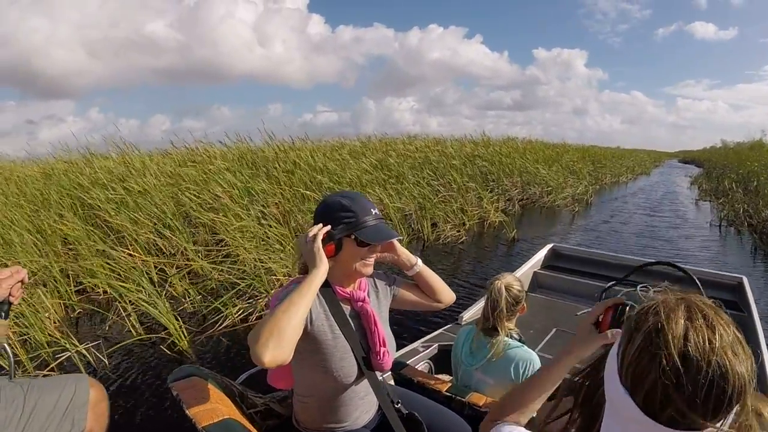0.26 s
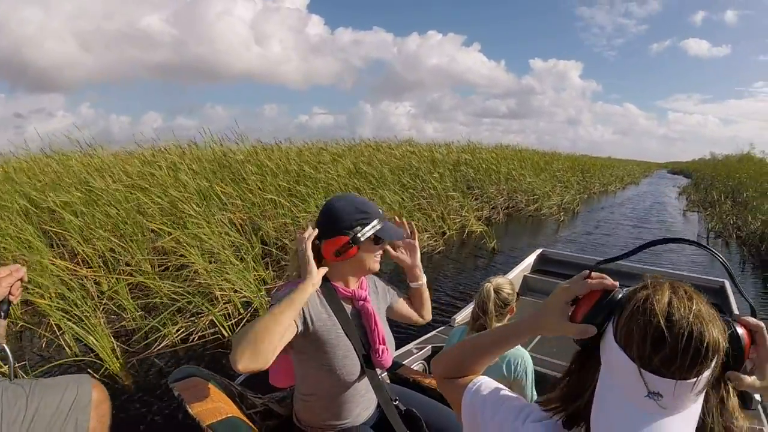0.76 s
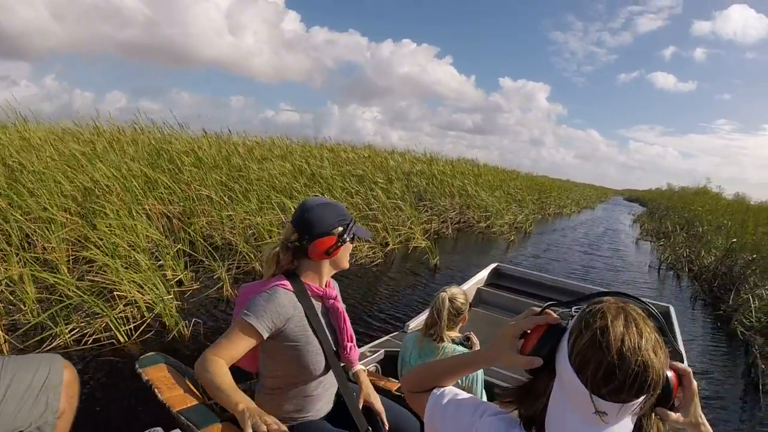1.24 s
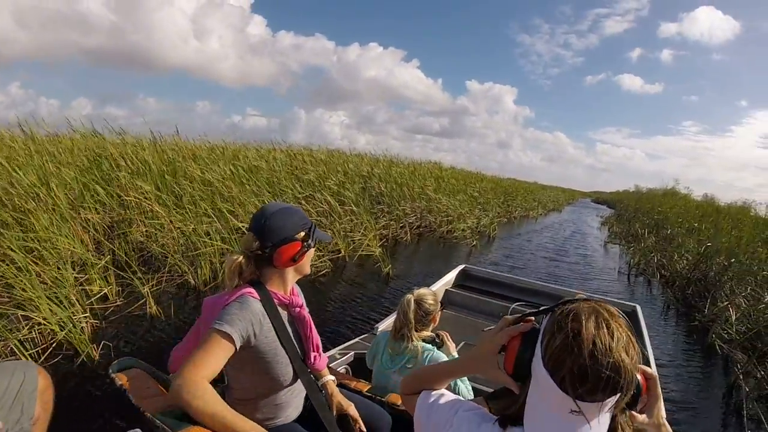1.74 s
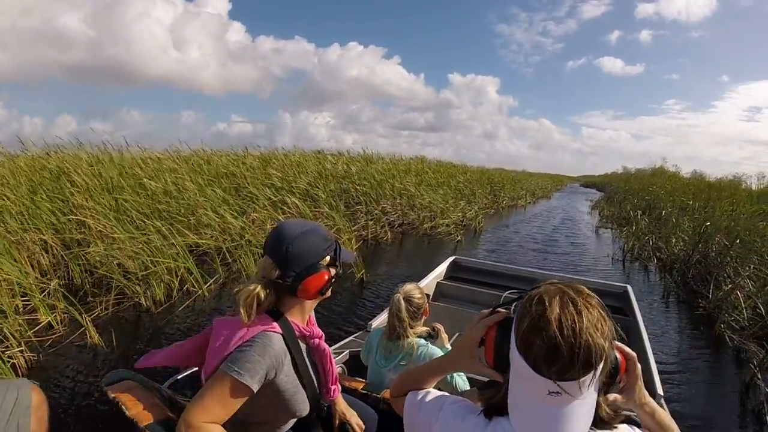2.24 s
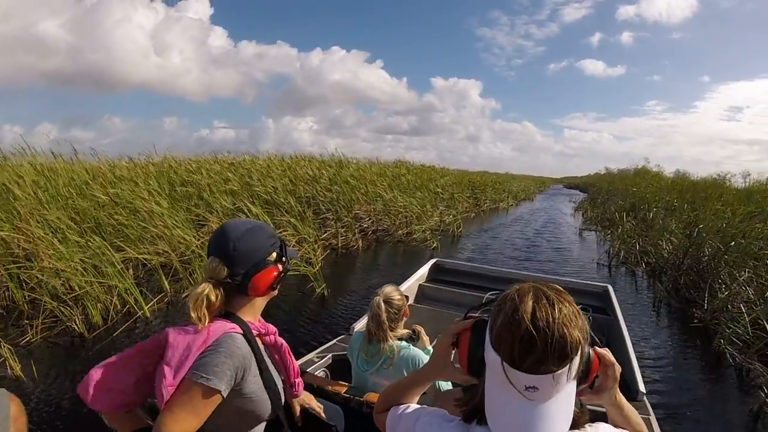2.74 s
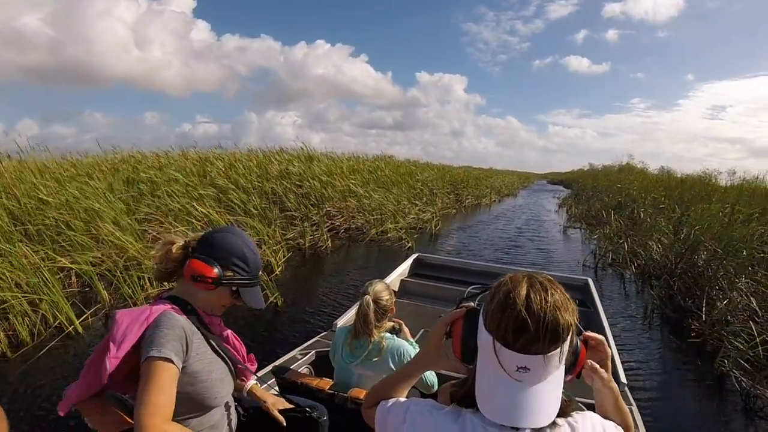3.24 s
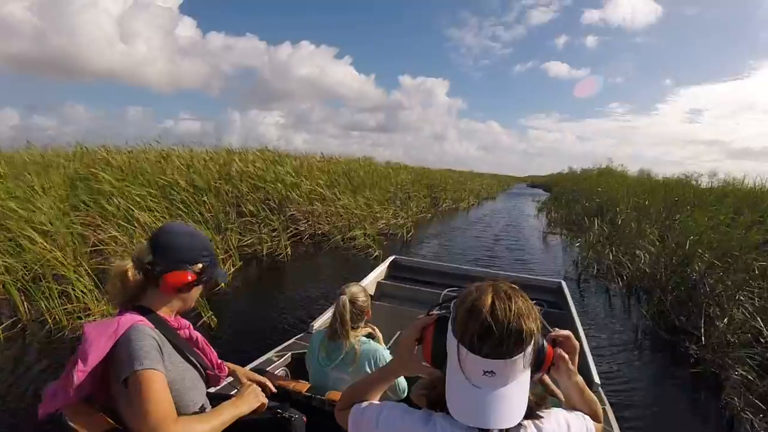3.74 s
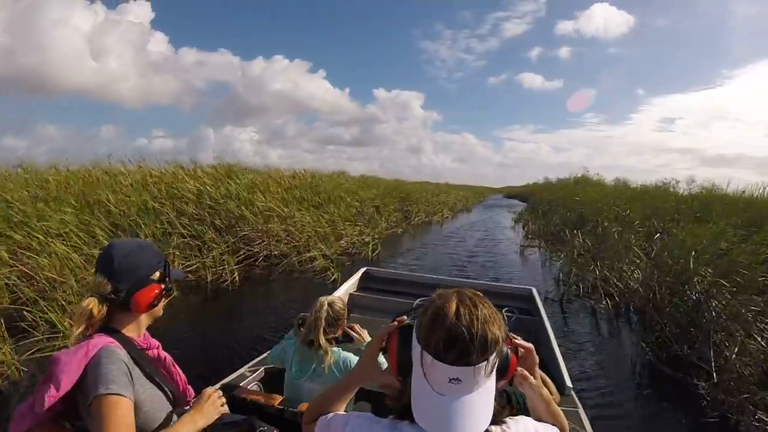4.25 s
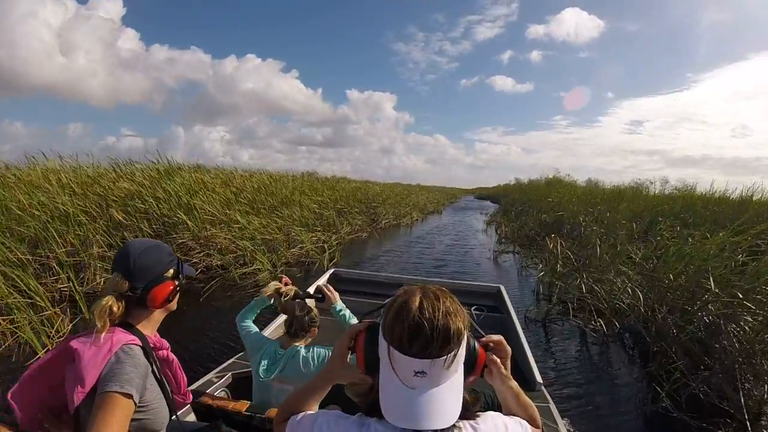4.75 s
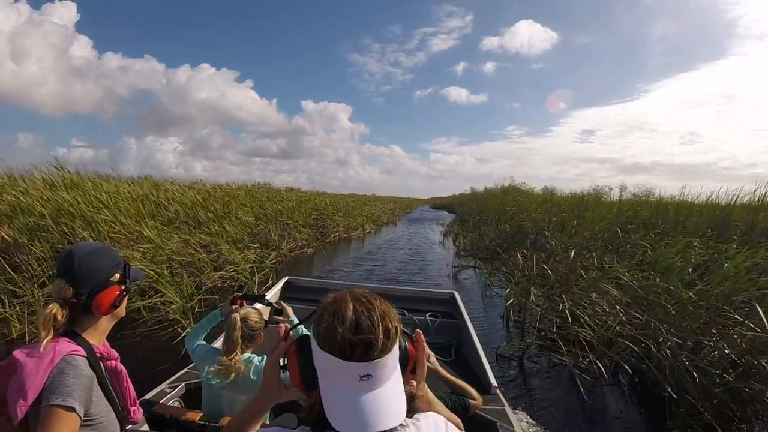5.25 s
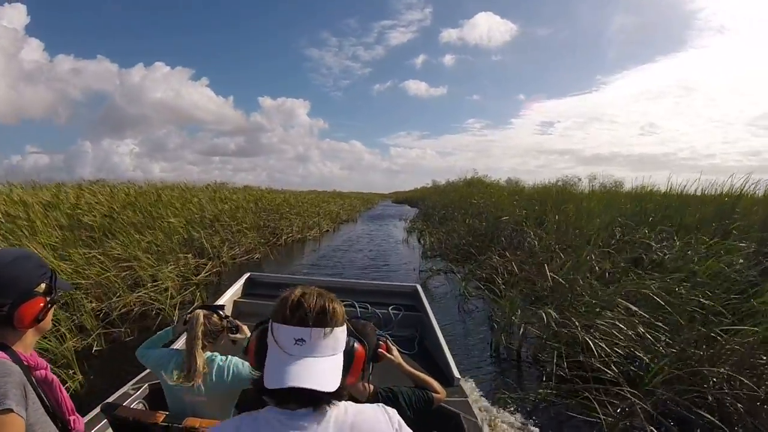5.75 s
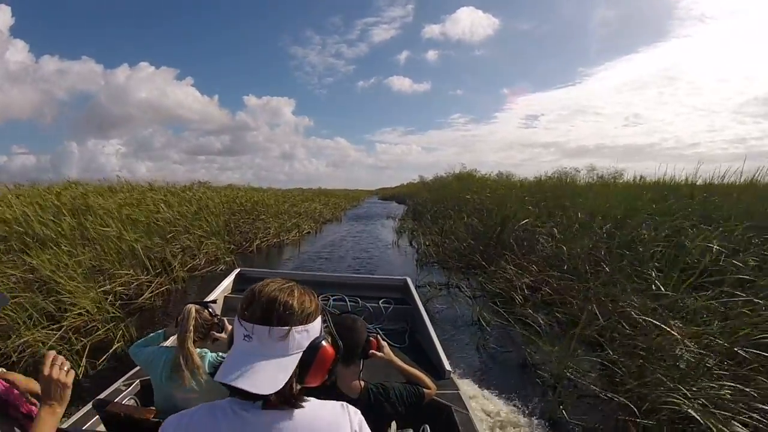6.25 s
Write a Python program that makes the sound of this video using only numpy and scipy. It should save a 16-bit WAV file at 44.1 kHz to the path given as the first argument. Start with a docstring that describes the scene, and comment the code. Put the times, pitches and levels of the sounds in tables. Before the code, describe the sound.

Close engine drone from an airboat: steady lumpy idle, then stepped surges rising in pitch and loudness into full roar, blade buzz and wind-like wash.

```python
"""The V8 exhaust of an airboat, heard from the passenger seats: it idles, then the throttle opens in steps.
The exhaust drones on multiples of the engine's two-turn firing cycle. The geared-down propeller adds
blade tones and a rush of air that grow with speed. Valve gear and intake air hiss, and the toothed
drive belt whines. An echo off the water weakens one band of the sound."""
import sys
import numpy as np
from scipy import signal
from scipy.fft import rfft, irfft, next_fast_len
from scipy.io import wavfile
from scipy.ndimage import uniform_filter1d, minimum_filter1d, map_coordinates

SR = 44100
rng = np.random.default_rng(int(sys.argv[2]) if len(sys.argv) > 2 else 0)


def wav_record(signal):
    """Record a signal, one row per channel, as 16-bit PCM in the file named by sys.argv[1]."""
    frames = np.transpose(np.atleast_2d(signal))
    bounded = np.clip(frames, -1, 1)
    # unit amplitude maps onto the largest positive 16-bit level
    quanta = np.round(bounded * 32767).astype(np.int16)
    wavfile.write(sys.argv[1], SR, quanta)


N = 286749  # length in samples, about 6.5 s

# the echo off the water cancels part of one band on the way to the seats: [f/Hz, level/dB]
WATER_ECHO_DIP = [(190, 0), (245, -9), (310, 1), (380, 1), (480, 0)]

CRUISE_RPM, FAST_RPM = 2850, 4250  # crankshaft turns a minute
# counts in one engine cycle, which takes two crankshaft turns
FIRING, BANK_BEAT, BELT_TEETH, BLADES_PER_CYCLE = 8, 5, 96, 2.626
PIPE_DISPERSION = -.21  # phase shift in turns, times the multiple squared
# throttle: lag of the speed in s; load at idle (0-1); added turns a minute that add a whole load
SPIN_UP_S, IDLE_LOAD, FULL_LOAD_RPM = .263, 0.11, 1080
# exhaust tones before the boom of the pipes: firing, then bank beat running easy and pulling hard
FIRING_DB, BANK_EASY_DB, BANK_HARD_DB = -8, -19.5, -7.5
BANK_FADE_DB = 6.5  # the banks even out by this much towards full speed
HARD_RPM, HARD_WIDTH_RPM = 2500, 85  # middle of the change to hard pulling, and how gradual it is
# blade tones: growth with the speed above that at which the blades begin to bite
THRUST_DB_PER_DECADE, BITE_RPM = 15, 1250
# blade tones: weaker below this pitch; share of wavering, and its growth with the multiple squared
BLADE_LOW_HZ, BLADE_ROUGH, BLADE_SMEAR = 62, .1, .0017
# rush of air: level it approaches, then onset, width and steepness of its rise
AIR_DB, AIR_START_RPM, AIR_SPAN_RPM, AIR_POWER = -20, 1234, 1575, 1.37
# mechanical hiss: base level, change at full load, change at full speed
HISS_DB, HISS_LOAD_DB, HISS_FAST_DB = -28, 1.5, -8
# the hiss starts out louder: for how long, the length of the fade, by how much
EXTRA_HISS_S, EXTRA_HISS_FADE_S, EXTRA_HISS_DB = 1.05, .25, 0.56
INTAKE_DB, INTAKE_FAST_DB = -35.5, -8  # intake air: at full load, change at full speed
# belt note: level at the starting speed, growth with speed, size of its slow wander
BELT_DB, BELT_DB_PER_OCTAVE, BELT_WANDER_DB = -49, 2.2, 1.5
TOP_HZ = 15100


def exhaust(cycles, cycle_hz, rpm, load):
    """Eight uneven firings a cycle; load changes their pattern and makes them less alike."""
    # other exhaust tones, before the pipe colour and the echo:
    # [multiple of the two-turn cycle, level idling/dB, level under load/dB]
    other_orders = [(2, -33, -17), (3, -26, -19), (4, -23, -32), (6, -29, -32), (7, -33, -27),
                    (9, -31, -29), (10, -29, -29), (11, -21, -32), (13, -23.5, -37), (14, -32, -41),
                    (15, -38, -38), (16, -36, -37), (17, -34, -45), (18, -28, -48), (19, -39, -43),
                    (20, -37, -47), (21, -32, -38), (24, -45, -36)]
    # colour the exhaust pipes give those tones: [f/Hz, level/dB]
    pipe_colour = [(25, -27), (50, -9.5), (80, -3), (120, 0), (160, 6.3), (200, 0), (250, -1.5), (480, -2),
                   (750, -4.5)]
    # boom of the pipes that the two leading tones sweep through: [f/Hz, level/dB]
    pipe_boom = [(90, -3), (115, -4.5), (135, -1.5), (148, -0.5), (160, -1.5), (170, -3.5), (180, -7),
                 (200, -14.5), (290, -12.5)]

    def turns(order):
        # the pipes delay each order differently, which smears the firings into a rolling throb
        return order * cycles + PIPE_DISPERSION * order ** 2

    firing_db = FIRING_DB + along(pipe_boom, FIRING * cycle_hz)
    out = amp(firing_db) * tone(turns(FIRING), rough=.02 + .1 * load ** 4, rate=12)

    # the unevenly firing banks add a slower beat
    hard = .5 + .5 * np.tanh((rpm - HARD_RPM) / HARD_WIDTH_RPM)
    beat_db = BANK_EASY_DB + hard * (BANK_HARD_DB - BANK_EASY_DB)
    beat_db = beat_db - BANK_FADE_DB * haste(rpm) + along(pipe_boom, BANK_BEAT * cycle_hz)
    out += amp(beat_db) * tone(turns(BANK_BEAT), rough=0.045, rate=13)

    for order, idle_db, load_db in other_orders:
        hz = order * cycle_hz
        level_db = idle_db + load ** 2.1 * (load_db - idle_db)
        level_db = level_db + along(pipe_colour, hz) + along(WATER_ECHO_DIP, hz)
        out += amp(level_db) * tone(turns(order), rough=0.085 + 0.11 * load, rate=10)
    return out


def propeller(blade_turns, rpm):
    """Blade tones grow with tip speed and radiate poorly when very low; gusty inflow smears the upper ones."""
    # blade tones, before thrust, low-pitch loss and echo:
    # [multiple of the blade rate, level up to cruise/dB, level at full speed/dB]
    blade_tones = [(1, -23, -13), (2, -26, -18.5), (3, -22.5, -20), (4, -24.5, -25.5), (5, -22, -34),
                   (6, -24.5, -27.5), (7, -32, -35), (8, -34, -38), (9, -31, -36), (10, -34, -40),
                   (11, -42, -39), (12, -42, -39), (13, -42, -43), (14, -42, -44), (15, -42, -47),
                   (16, -46, -48)]
    blade_hz = np.gradient(blade_turns) * SR
    fast = haste(rpm)
    bite = np.minimum((rpm - BITE_RPM) / (CRUISE_RPM - BITE_RPM), 1)
    thrust_db = THRUST_DB_PER_DECADE * np.log10(bite)
    sway = 0.0034 * wobble(12)  # small shared timing drift, in blade turns
    out = np.zeros(N)
    for order, cruise_db, fast_db in blade_tones:
        hz = order * blade_hz
        rough = BLADE_ROUGH + BLADE_SMEAR * order ** 2
        partial = tone(order * (blade_turns + sway) + rng.random(), rough, rate=14)
        level_db = cruise_db + fast * (fast_db - cruise_db) + along(WATER_ECHO_DIP, hz)
        out += amp(level_db) * np.minimum(hz / BLADE_LOW_HZ, 1) * partial
    return amp(thrust_db) * out


def wash(blade_turns, rpm):
    """Turbulent air leaves the blades: it rises with speed, levels off, and swells a little as each one passes."""
    # relative colour of the rushing air: [f/Hz, level/dB]
    air_colour = [(20, -3), (75, 0.5), (125, -2.5), (220, 1), (360, -1.5), (550, -5), (850, -7),
                  (1400, -12), (2200, -16), (3500, -19.5), (5100, -27.5), (6400, -27.5), (7300, -31.5),
                  (10500, -38.5), (15000, -50.5)]
    flow = np.tanh(np.maximum(rpm - AIR_START_RPM, 1) / AIR_SPAN_RPM) ** AIR_POWER
    chop = 1 + 0.085 * np.cos(2 * np.pi * blade_turns) + 0.072 * np.cos(4 * np.pi * blade_turns)
    return amp(AIR_DB) * flow * unit(chop * rush(air_colour))


def machinery(cycles, rpm, load):
    """Valve gear hisses in time with the firings; the opened throttle adds the rush of intake air."""
    # relative colour of the valve gear's hiss: [f/Hz, level/dB]
    hiss_colour = [(15, -8), (60, -1.5), (170, -0.5), (240, -3), (350, -4.5), (500, -14), (800, -18.5),
                   (1400, -24), (3000, -27.5), (4500, -31.5), (6300, -33.5), (7300, -43), (10000, -52.5),
                   (11500, -60.5), (14500, -74)]
    # relative colour of the intake air: [f/Hz, level/dB]
    intake_colour = [(200, -19), (350, 13.5), (600, 20), (1200, 1), (2500, -7.5), (4000, 0.5), (5200, -11),
                     (7000, -3), (10400, -13), (11500, -24), (14000, -26), (15200, -38)]
    extra = np.clip(1 - (np.arange(N) / SR - EXTRA_HISS_S) / EXTRA_HISS_FADE_S, 0, 1)
    fast = haste(rpm) ** 2
    hiss_db = HISS_DB + EXTRA_HISS_DB * extra + HISS_LOAD_DB * load + HISS_FAST_DB * fast
    hiss = amp(hiss_db) * rush(hiss_colour)
    intake_air = amp(INTAKE_DB + INTAKE_FAST_DB * fast) * load ** 0.63 * rush(intake_colour)
    puffs = 1 + 0.087 * np.cos(2 * np.pi * FIRING * cycles)
    return puffs * (hiss + intake_air)


def belt(cycles, rpm, load):
    """Meshing teeth whine, louder with speed, with an overtone; the slack belt spreads a fuzz round the note."""
    # level of the belt's overtone: [t/s, level/dB]
    overtone_levels = [(1.05, -52), (1.3, -62), (2.4, -52), (3.7, -61)]
    note_db = BELT_DB + BELT_DB_PER_OCTAVE * np.log2(rpm / rpm[0]) + BELT_WANDER_DB * wobble(3)
    mesh = BELT_TEETH * cycles
    note = amp(note_db) * tone(mesh, rough=0.55, rate=22)
    fuzz = amp(-46.5 - 6.1 * load) * tone(mesh, rough=7.2, rate=170)
    overtone = amp(curve(overtone_levels)) * tone(2 * mesh, rough=0.35, rate=31)
    return note + fuzz + overtone


def crankshaft():
    """Speed and load: the load follows the throttle at once, the speed lags with the propeller's inertia."""
    # the idle creeps up a little: [t/s, crankshaft speed/(turns a minute)]
    idle_speed = [(0, 1349), (1.1, 1371)]
    # pushes on the throttle: [start t/s, length/s, added speed/(turns a minute)]
    throttle_pushes = [(1.84, .27, 515), (2.87, .15, 370), (3.305, .2, 652), (4.5, .56, 865),
                       (5.11, .845, 538)]
    t = np.arange(N) / SR
    throttle = np.zeros(N)
    for start, length, added in throttle_pushes:
        throttle += added * np.clip((t - start) / length, 0, 1)
    keep = np.exp(-1 / (SPIN_UP_S * SR))
    rpm = curve(idle_speed) + signal.lfilter([1 - keep], [1, -keep], throttle)
    load = np.clip(IDLE_LOAD + throttle / FULL_LOAD_RPM, 0, 1)
    return rpm, load


def haste(rpm):
    """0 up to cruising speed, 1 at full speed."""
    return np.clip((rpm - CRUISE_RPM) / (FAST_RPM - CRUISE_RPM), 0, 1)


def tone(turns, rough, rate):
    """A partial of rms about 1 whose strength and phase waver by the share rough, rate times a second."""
    angle = 2 * np.pi * turns
    in_step = (1 + rough * wobble(rate)) * np.sin(angle)
    quarter_turn_off = rough * wobble(rate) * np.cos(angle)
    return (in_step + quarter_turn_off) / np.sqrt(.5 + rough ** 2)


def rush(colour):
    """Coloured noise of rms 1; coming from a wide source, it takes only a share of the water echo's dip."""
    def response(hz):
        return amp(along(colour, hz) + 0.35 * along(WATER_ECHO_DIP, hz))
    return unit(filtered(rng.standard_normal(N), response))


def wobble(rate):
    """A smooth random curve, rate knots a second."""
    at = np.linspace(0, N * rate / SR, N // 64)
    coarse = map_coordinates(rng.standard_normal(4096), [at], mode="wrap")
    return np.interp(np.linspace(0, len(at) - 1, N), np.arange(len(at)), coarse)


def filtered(x, response):
    """x with each frequency scaled by response(hz)."""
    m = next_fast_len(N + SR // 2)  # spare room at the end
    return irfft(rfft(x, m) * response(np.fft.rfftfreq(m, 1 / SR)), m)[:N]


def along(points, hz):
    """Read a curve of (Hz, value) points on a log frequency axis."""
    f, v = np.transpose(points)
    return np.interp(np.log(hz + 1), np.log(f + 1), v)


def curve(points):
    """Turn (s, value) points into one value per sample."""
    s, v = np.transpose(points)
    return np.interp(np.arange(N) / SR, s, v)


def amp(db):
    """Turn decibels into an amplitude factor."""
    return 10 ** (np.asarray(db) / 20)


def unit(x):
    """Scale x to rms 1."""
    return x / np.sqrt(np.mean(x ** 2) + 1e-20)


def scene():
    """One crankshaft drives every source."""
    rpm, load = crankshaft()
    cycle_hz = rpm / 120  # one cycle takes two turns
    cycles = np.cumsum(cycle_hz) / SR
    blade_turns = BLADES_PER_CYCLE * cycles
    engine = exhaust(cycles, cycle_hz, rpm, load)
    engine += machinery(cycles, rpm, load) + belt(cycles, rpm, load)
    return (engine + propeller(blade_turns, rpm) + wash(blade_turns, rpm))[None]


def limiter(x, ceiling, size):
    """The gain ducks smoothly around each peak that would pass the ceiling."""
    needed = minimum_filter1d(np.minimum(1, ceiling / (np.abs(x) + 1e-9)), 2 * size)
    gain = uniform_filter1d(uniform_filter1d(needed, size), size)
    return x * gain


def record(dry):
    """Limit the peaks, soften both ends and remove everything from the top frequency up."""
    held = limiter(dry[0], ceiling=.92, size=150)  # size in samples
    soft_ends = signal.windows.tukey(N, .001)
    return filtered(held * soft_ends, lambda hz: hz < TOP_HZ)[None]


dry = scene()
out = record(dry)
wav_record(out)
```